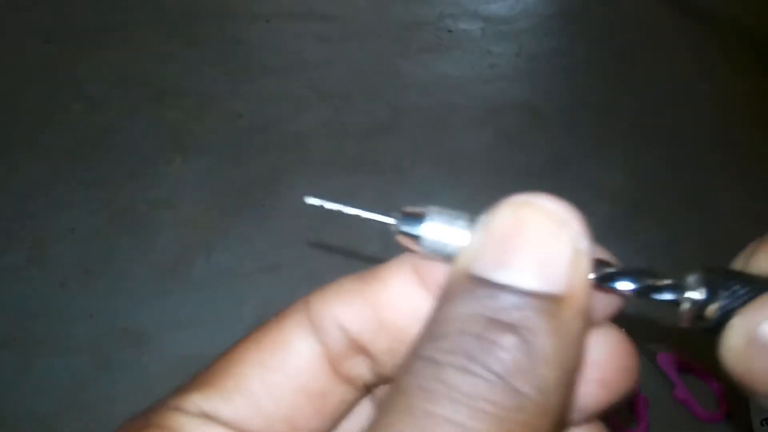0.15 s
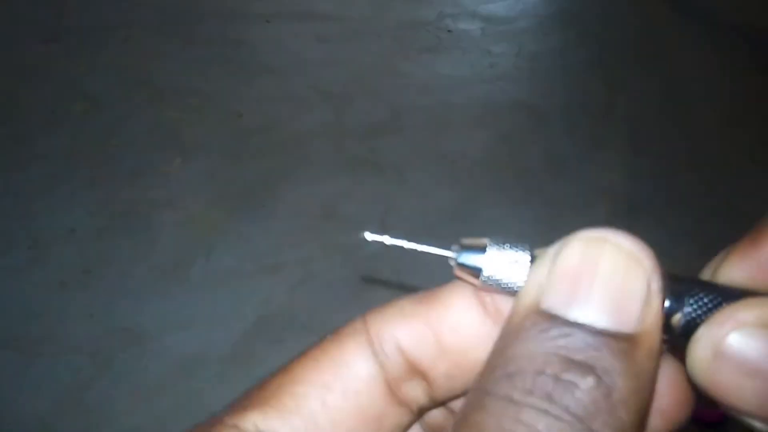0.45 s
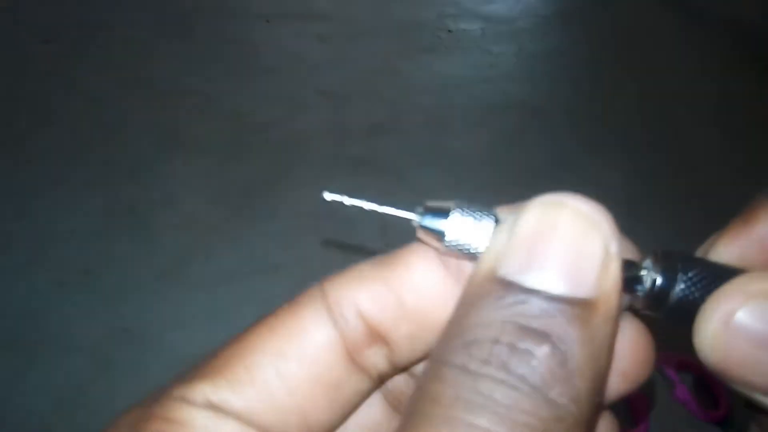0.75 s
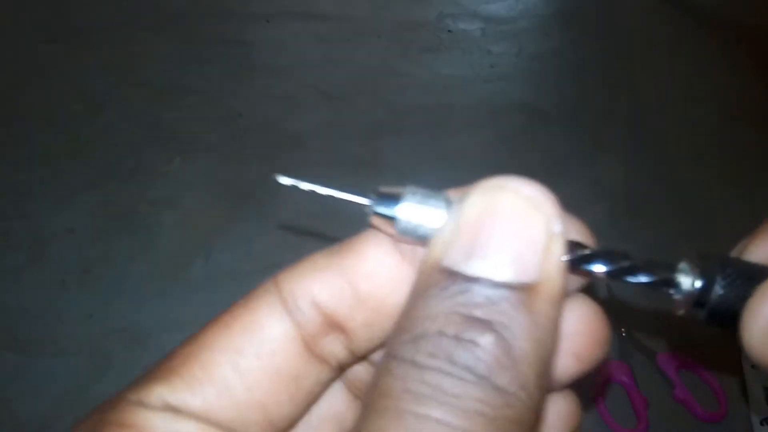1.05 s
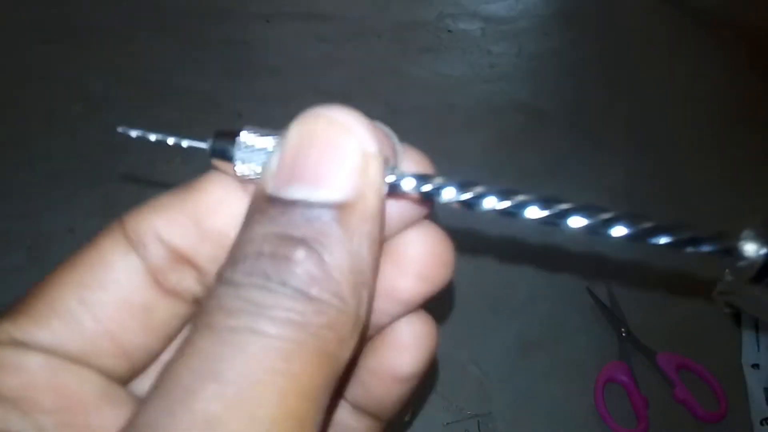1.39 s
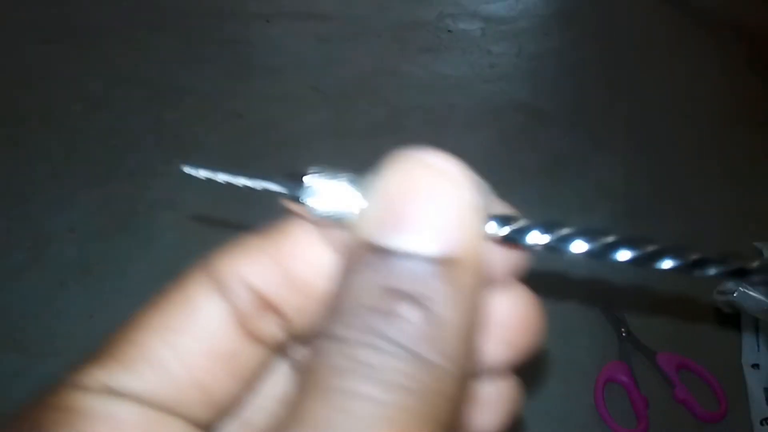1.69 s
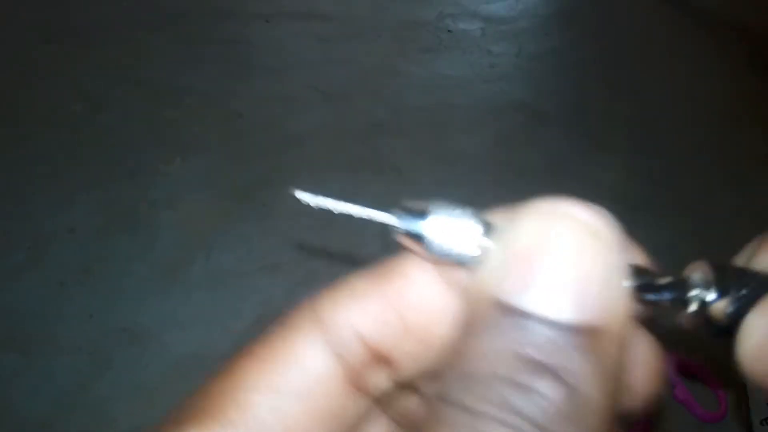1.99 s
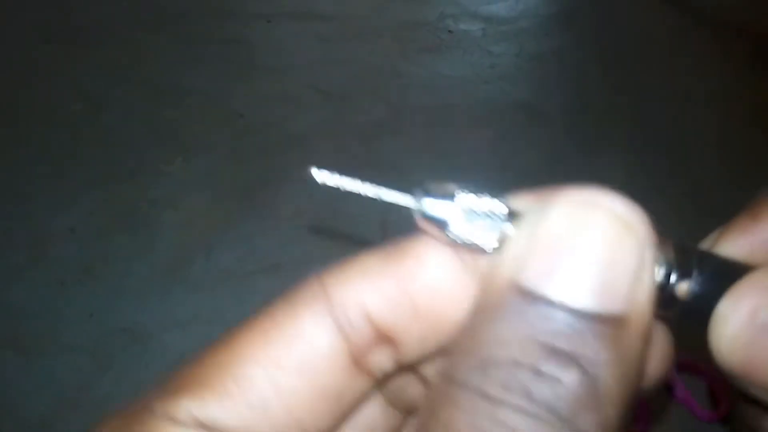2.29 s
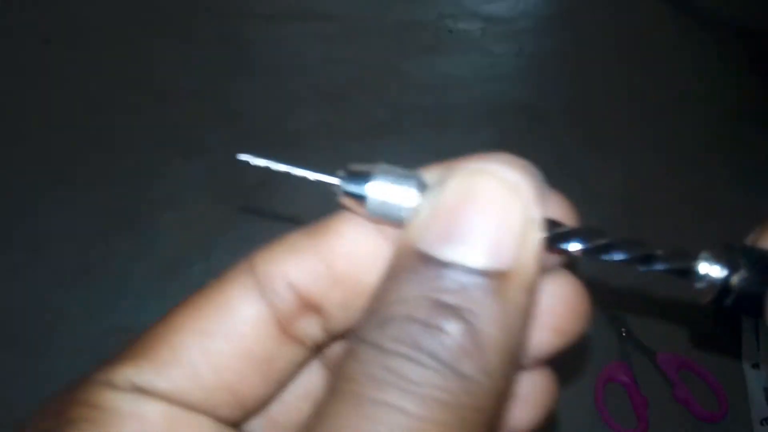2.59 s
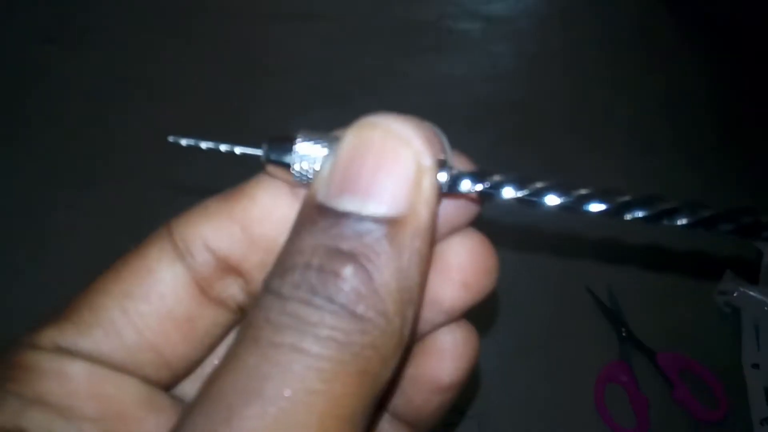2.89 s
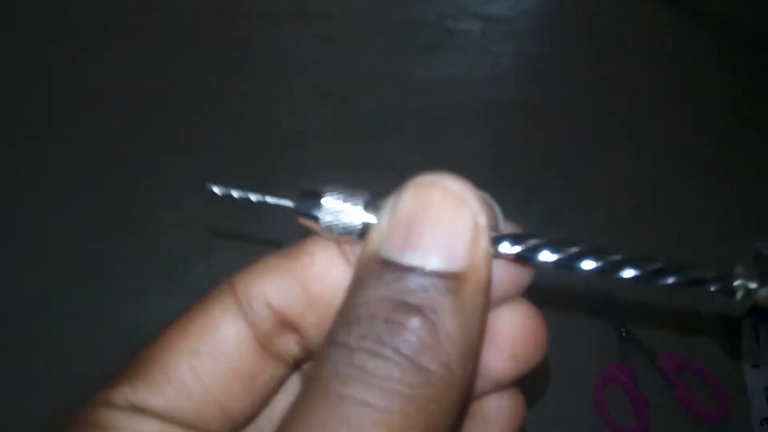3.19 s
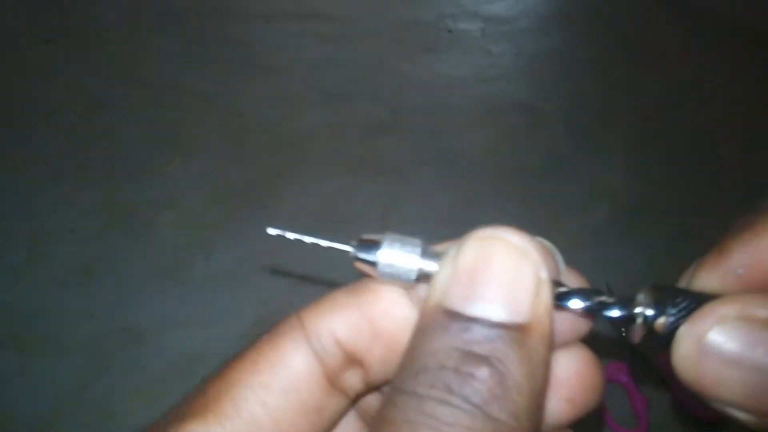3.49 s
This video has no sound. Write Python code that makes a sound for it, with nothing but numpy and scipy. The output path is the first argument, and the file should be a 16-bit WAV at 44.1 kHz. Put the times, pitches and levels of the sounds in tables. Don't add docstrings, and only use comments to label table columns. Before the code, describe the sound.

Hand push drill: bright metallic zipping strokes with sharp clicks at each turn, in a quiet room.

```python
import sys
import numpy as np
from scipy import signal
from scipy.io import wavfile

SR = 44100
rng = np.random.default_rng(int(sys.argv[2]) if len(sys.argv) > 2 else 0)


def pcm_store(signal):
    levels = np.round(np.clip(np.atleast_2d(signal), -1, 1) * 32767)
    wavfile.write(sys.argv[1], SR, levels.astype(np.int16).T)


def to_linear_factor(level_db):
    exponent = np.asarray(level_db, float) / 20
    return 10 ** exponent


N = 160965
TIME_S = np.arange(N) / SR


def rms_one(x):
    return x / np.sqrt(np.mean(x ** 2) + 1e-20)


def at_hz(points, hz):
    points = np.array(points)
    return np.interp(np.log(hz), np.log(points[:, 0]), points[:, 1])


def drift(rate_hz):
    step = 40
    r = np.exp(-2 * np.pi * rate_hz * step / SR)
    white = rng.standard_normal(N // step + 2002)
    slow = signal.lfilter([1], [1, -2 * r, r * r], white)[2000:]
    return np.interp(np.arange(N) / step, np.arange(len(slow)), rms_one(slow))


def band(x, low_hz, high_hz):
    return signal.sosfilt(signal.butter(2, [low_hz, high_hz], "band", fs=SR, output="sos"), x + 1e-18)


def resonate(x, hz, width_hz):
    r = np.exp(-np.pi * width_hz / SR)
    poles = [1, -2 * r * np.cos(2 * np.pi * hz / SR), r * r]
    return signal.lfilter([1, 0, -1], poles, x + 1e-18) * np.sqrt(1 - r * r) / 2


def moving(x, hz, width_hz, count=1):
    turn = np.exp(2j * np.pi * np.cumsum(hz) / SR)
    r = np.exp(-np.pi * width_hz / SR)
    gain = 2 * np.sqrt(1 - r) if count == 1 else np.sqrt(8 * (1 - r) ** 3)
    slow = signal.lfilter([1], np.poly([r] * count), x / turn)
    return gain * (slow * turn).real


def marks(s, size):
    out = np.zeros(N)
    np.add.at(out, np.minimum((np.asarray(s) * SR).astype(int), N - 1), size)
    return out


# f/Hz, level/dB [dB per Hz]
HUM_SPECTRUM = [(30, -18), (60, -0.5), (130, 0.5), (470, -8.5), (900, -10.5), (1800, -14.5), (6500, -23),
                (13000, -37.5)]
# f/Hz, correlation [-1 to 1]
COHERENCE = [(60, 0.6), (700, 0.71), (3000, 0.67)]


def hum():
    out = 0
    edges = 22 * 2 ** np.arange(0, 9.6, .5)
    white = rng.standard_normal((2, 2, N))
    for k, (low, high) in enumerate(zip(edges, edges[1:])):
        mid, side = band(white[k % 2], low, high)
        hz = np.sqrt(low * high)
        alike = np.clip(at_hz(COHERENCE, hz), -1, 1)
        stereo = np.sqrt(1 + alike) * mid + np.sqrt(1 - alike) * side * [[1], [-1]]
        out = out + to_linear_factor(at_hz(HUM_SPECTRUM, hz) + 2.34 * drift(6.7)) * stereo
    return to_linear_factor(-66.5) * rms_one(out)


def room(x):
    t60_s, level_db, wall_cut_hz = 0.26, -11.5, 7250
    t = np.arange(int(.5 * SR)) / SR
    white = rng.standard_normal(len(t))
    dull = signal.sosfilt(signal.butter(2, wall_cut_hz, fs=SR, output="sos"), white)
    tail = dull * to_linear_factor(-60 * t / t60_s) + (white - dull) * to_linear_factor(-60 * t / (t60_s * 0.5))
    tail = tail * (t > .004)
    return to_linear_factor(level_db) * signal.fftconvolve(x, tail / np.sqrt(np.sum(tail ** 2)))[:N]


# t/s, peak level/dB
THUDS = [
    (2.208, -57),
    (2.241, -51),
    (2.391, -63),
]


def thuds():
    top_hz, level_db = 354, -5.5
    s, db = np.transpose(THUDS)
    t = np.arange(int(.08 * SR)) / SR
    shape = t / 0.0044 * np.exp(1 - t / 0.0068)
    puff = signal.fftconvolve(marks(s, to_linear_factor(db + level_db)), shape)[:N]
    return puff * rms_one(band(rng.standard_normal(N), top_hz / 4, top_hz * 1.05))


# t/s, level/dB
KNOCKS = [
    (2.175, -47.5),
    (3.15, -51),
    (3.17, -47.5),
]


def knocks():
    knock_hz, t60_s = 970, 0.029
    s, db = np.transpose(KNOCKS)
    t = np.arange(int(.05 * SR)) / SR
    burst = signal.fftconvolve(marks(s, to_linear_factor(db)), to_linear_factor(-60 * t / t60_s))[:N]
    return burst * rms_one(band(rng.standard_normal(N), knock_hz * 0.71, knock_hz * 1.24))


# t/s, length/s, start f/Hz, end f/Hz, level/dB
SQUEAKS = [
    (1.846, 0.034, 6780, 7320, -37.5),
    (3.375, 0.039, 6630, 7060, -48),
]


def squeaks():
    out = 0
    for s, length, start_hz, end_hz, db in SQUEAKS:
        part = np.clip((TIME_S - s) / length, 0, 1)
        phase = 2 * np.pi * np.cumsum(start_hz + (end_hz - start_hz) * part) / SR
        out = out + to_linear_factor(db) * np.sin(np.pi * part) * np.sin(phase)
    return out


# t/s, peak level/dB, brightness level/dB
TICKS = [(0.0405, -27, 3), (0.1535, -27.5, 3), (0.387, -18, -6), (0.5024, -27.5, -8), (0.676, -45, -16),
         (0.696, -35, -16), (0.706, -37.5, -16), (0.7841, -40, 5), (1.0523, -27, 2), (1.1192, -35, 4),
         (1.655, -32, 5), (1.6705, -35, -1), (1.6767, -28.5, -5), (1.6881, -26.5, -3), (1.7044, -20.5, 0.5),
         (1.9457, -26, -3), (2.1767, -16, 3), (2.2372, -28.5, 1.5), (2.3545, -62, -33), (2.3686, -32, -14),
         (2.386, -25, -3.5), (2.9143, -34.5, -6), (3.0778, -32, 6.5), (3.107, -43, 3), (3.132, -19.5, -0.5),
         (3.1523, -24, -1), (3.3747, -53, -3), (3.437, -25.5, -3), (3.4847, -30, -3)]
# f/Hz, width/Hz, level/dB
TICK_MODES = [(2245, 530, -13), (3200, 405, 0.5), (3510, 175, 0.5), (3970, 235, -0.5), (5400, 990, -4.5),
              (6400, 430, -2.5)]


def ticks():
    t60_s, rise_s, tick_db, crack_db = .009, .0003, -1.5, -2
    s, db, bright_db = np.transpose(TICKS)
    t = np.arange(int(.05 * SR)) / SR
    shape = (1 - np.exp(-t / rise_s)) * to_linear_factor(-60 * t / t60_s)

    def contact(level_db):
        return rng.standard_normal(N) * signal.fftconvolve(marks(s, to_linear_factor(level_db)), shape)[:N]

    low, high = contact(db + tick_db), contact(db + tick_db + bright_db)
    body = 0
    for k, (hz, width_hz, mode_db) in enumerate(TICK_MODES):
        body = body + (-1) ** k * to_linear_factor(mode_db / 2) * resonate(low, hz, 2 * width_hz)
    return body + to_linear_factor(crack_db) * band(low, 2950, 5700) + band(high, 9540, 13000)


# t/s, extra level/dB
RIDGES_FIRST_RETURN = [(1.0117, -2), (1.0276, -2), (1.0692, -6), (1.0884, -2), (1.1029, -16), (1.1235, -2),
                       (1.1446, -6), (1.1568, -3.5), (1.1754, -3), (1.1906, 0.1), (1.2047, 0), (1.2155, -2),
                       (1.232, 2.5), (1.2502, -4), (1.263, -5), (1.2735, -2), (1.281, -3.5), (1.288, 0),
                       (1.2962, -2), (1.306, -3), (1.3194, 3), (1.3314, -1), (1.346, -2), (1.359, -7),
                       (1.3773, -2), (1.3826, 5.5), (1.397, -3), (1.408, -4), (1.4193, -3), (1.4307, -2),
                       (1.4487, -1), (1.476, -8), (1.488, -10)]
# t/s, extra level/dB
RIDGES_SECOND_RETURN = [(2.5994, 0.5), (2.613, 0.5), (2.6224, 4), (2.633, -1), (2.6467, 5), (2.6606, 0),
                        (2.6741, 3.5), (2.69, 6), (2.7052, 1.5), (2.7156, 0.5), (2.725, 1), (2.738, -1),
                        (2.7486, 4.5), (2.7594, 0.5), (2.7693, 0), (2.7813, 4), (2.7951, 0.5), (2.809, -11),
                        (2.834, -8.5)]
# t/s, extra level/dB
RIDGES_PUSHES = [(.008, 2), (0.189, -10), (0.2073, -1), (0.3407, -4), (0.159, 6), (0.229, -15), (0.395, -8),
                 (0.4558, 3), (0.462, 2), (0.475, 14), (0.488, 1), (0.819, -6), (0.899, 4.5), (0.929, 0),
                 (1.716, -11), (1.775, -14), (1.7636, -11), (1.8024, -2), (1.8173, -6), (1.841, -4.5),
                 (1.879, 0), (1.891, 7), (1.92, 1), (1.986, -0.5), (2.123, -7), (2.438, 4), (2.446, 2),
                 (2.503, -5), (2.219, 3), (3.1782, 10), (3.208, 1), (3.2365, 0.5), (3.255, -5),
                 (3.314, -10), (3.343, -9), (3.376, 7), (3.46, -2), (3.493, 2), (3.531, 4), (3.553, -2)]


def ridge_pressure():
    ridge_db, spread_db, width_s = 11, .7, .0024
    s, extra_db = np.transpose(RIDGES_FIRST_RETURN + RIDGES_SECOND_RETURN + RIDGES_PUSHES)
    t = np.arange(-300, 301) / SR
    strength = to_linear_factor(ridge_db + extra_db + spread_db * rng.standard_normal(len(s)))
    return signal.fftconvolve(marks(s, strength), np.exp(-(t / width_s) ** 2), "same")


# t/s, chuck f/Hz, handle f/Hz, chuck level/dB, handle level/dB, hiss level/dB
GRIP = [
    [(0.0, 3320, 2300, -0.5, -8.5, -9), (0.12, 3280, 2410, 2.5, -3, -13), (0.3, 3230, 2300, -3, -11.5, -2),
     (0.52, 3330, 2220, -12, -8.5, -16)],
    [(0.67, 3370, 2170, -12, -1, -24), (0.78, 3050, 2230, -1, -9, -26), (1.0, 3250, 2240, -3.5, -7, -16.5),
     (1.19, 3300, 2310, -1, -15, -17), (1.49, 3540, 2190, 1, -7.5, -16)],
    [(1.72, 3494, 2100, 2.5, -6.5, -29), (2.018, 3340, 2370, -2, -12, -11),
     (2.11, 3255, 2210, 5, -10.5, -7), (2.24, 3430, 2040, -10, -7, -16)],
    [(2.36, 3410, 2220, -3.5, -6.5, -30), (2.624, 3224, 2265, -0.5, -14, -15),
     (2.74, 3400, 2340, -4, -12, -8.5), (2.92, 3560, 2220, 2, -12, -29)],
    [(3.14, 3515, 2250, 3, -11.5, -36), (3.542, 3164, 2380, -3.5, -4.5, -5.5)],
]
GRIP_POINTS = np.concatenate(GRIP)


def grip_at(column):
    return np.interp(TIME_S, GRIP_POINTS[:, 0], GRIP_POINTS[:, column])


# f/Hz, width/Hz, level/dB
BODY_MODES = [(3547, 210, -6.5), (4096, 280, -7), (5400, 540, -6.5), (6400, 430, -6.5)]


def body_modes(low):
    body = 0
    for k, (hz, width_hz, db) in enumerate(BODY_MODES):
        width_hz = min(width_hz, hz / 16)
        body = body + (-1) ** k * to_linear_factor(db + 2.5 * drift(23.7)) * resonate(low, hz, width_hz)
    chuck = moving(low, grip_at(1) + 50 * drift(16.0), 422, count=2)
    handle = moving(low, grip_at(2) + 50 * drift(15.0), 430, count=2)
    body = body - to_linear_factor(grip_at(3) + 1.5 * drift(21.0)) * chuck
    body = body + to_linear_factor(grip_at(4) + 1.5 * drift(21.0)) * handle
    return body + to_linear_factor(-20.5) * resonate(low, 1750, 480)


# f/Hz, width/Hz, level/dB
SHEEN_MODES = [(9215, 770, -12), (10850, 1030, 3.5), (12320, 3000, -2), (13500, 270, -6.5),
               (14700, 660, -16)]


def sheen_modes(high, sing, nut_hz):
    sheen = 0
    for k, (hz, width_hz, db) in enumerate(SHEEN_MODES):
        sheen = sheen + (-1) ** k * to_linear_factor(db + 2.5 * drift(15.0)) * resonate(high, hz, width_hz)
    sheen = sheen + to_linear_factor(-6) * sing * resonate(high, 11230, 920)
    return sheen + to_linear_factor(-14) * moving(high, nut_hz, 590)


def rod_song(mid, sing, nut_hz):
    ring_hz, ring_t60_s, ring_db = 6550, 0.045, -30
    song = to_linear_factor(-0.23 + 3.0 * drift(24.0)) * moving(mid, nut_hz, 120)
    ring = resonate(mid * sing, ring_hz, np.log(1000) / np.pi / ring_t60_s)
    return sing * song + to_linear_factor(ring_db) * ring


# t/s, friction level/dB, rod singing level/dB, brightness level/dB
FIRST_STROKE = [
    [(0, -52, -20, -2.5), (.09, -54.5, -40, -3.5), (.2, -52.5, -18, -1), (.29, -38, -16, -4),
     (.35, -43.5, -10.5, -3), (.44, -42.5, -6.5, -0.5), (.49, -69, -12, -8), (.53, -87, -12, 8)],
]
# t/s, friction level/dB, rod singing level/dB, brightness level/dB
MIDDLE_STROKES = [
    [(.665, -71, 11, -24), (.7, -51, -9, -26), (.74, -62.5, -42, -5), (0.97, -57, -14, 0.5),
     (1.11, -51, -10, 5.5), (1.125, -47, -1, 4), (1.27, -45, 1, 7), (1.38, -47, 2, 1),
     (1.488, -54, 2.5, 11)],
    [(1.7, -50, -20, 3), (1.76, -44.5, -1, 4.5), (1.85, -49, 4, 4), (1.92, -50, -13.5, -4),
     (2.02, -50.5, -26, 0), (2.1, -44.5, 1, -0.5), (2.19, -41, 0, 1), (2.25, -86, 4, 18)],
]
# t/s, friction level/dB, rod singing level/dB, brightness level/dB
LAST_STROKES = [
    [(2.352, -58, -24, -13), (2.45, -58, -30, -1.5), (2.56, -49, -27, -2), (2.63, -46, -12, 7),
     (2.75, -43, -12.5, 5), (2.81, -43.5, -1.5, 1.5), (2.87, -49.5, 4.5, 10), (2.92, -52.5, -3, 4)],
    [(3.135, -55.5, -21, 7), (3.2, -53, -4, -3), (3.28, -51.5, 10, 2), (3.35, -54, 15, 4.5),
     (3.41, -52.5, -1, 3), (3.46, -57, -12, -5), (3.56, -53, -21, -1.5), (3.65, -49, 3, -1)],
]
# t/s, f/Hz
NUT_PATH = [(.23, 5200), (.3, 6200), (.62, 5980), (.66, 5380), (1.13, 5620), (1.25, 5890), (1.38, 6350),
            (1.46, 6590), (1.7, 6600), (2.3, 6400), (2.34, 5400), (2.76, 5710), (2.79, 6500), (2.85, 6550)]


def friction():
    rows = []
    for stroke in FIRST_STROKE + MIDDLE_STROKES + LAST_STROKES:
        silent_before = (stroke[0][0] - .012, -100, 0, -20)
        silent_after = (stroke[-1][0] + .004, -100, 0, 0)
        rows += [silent_before, *stroke, silent_after]
    rows = np.array(rows)
    level, sing, bright = (to_linear_factor(np.interp(TIME_S, rows[:, 0], rows[:, k])) for k in (1, 2, 3))
    nut_hz = np.interp(TIME_S, *np.transpose(NUT_PATH)) + 40 * drift(19.0)

    rub = rng.standard_normal((3, N)) * level * to_linear_factor(1.2 * drift(71.0))
    ridge_share = to_linear_factor([[-11.5], [0], [-1.5]])
    low, high, mid = rub * (1 + ridge_pressure() * ridge_share)

    treble = to_linear_factor(-4.5) * sheen_modes(high, sing, nut_hz)
    treble = treble + to_linear_factor(-13.5) * band(high, 8500, 14000)
    treble = treble + to_linear_factor(grip_at(5) + 2.5) * band(high, 5300, 9680)
    return body_modes(low) + bright * treble + rod_song(mid, sing, nut_hz)


def scene():
    radiation = signal.butter(4, 1220, "high", fs=SR, output="sos")
    rod = signal.sosfilt(radiation, friction() + ticks())
    drill = rod + squeaks() + thuds() + knocks()
    return drill + room(drill) + hum()


def roll_off(x):
    return signal.sosfilt(signal.butter(12, 16270, fs=SR, output="sos"), x)


def record(dry):
    x = signal.sosfilt(signal.butter(2, 45, "high", fs=SR, output="sos"), dry)
    x = signal.sosfilt(signal.cheby2(14, 70, 15850 + 350, fs=SR, output="sos"), x)
    return roll_off(x)


dry = scene()
out = record(dry)
pcm_store(out)
```